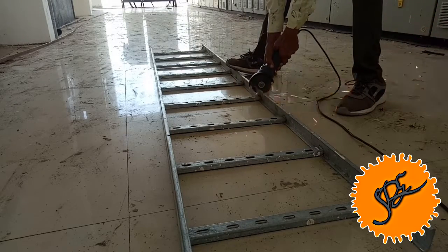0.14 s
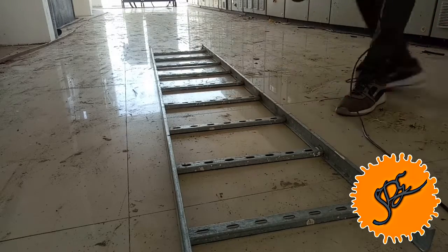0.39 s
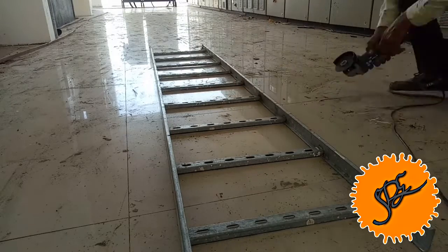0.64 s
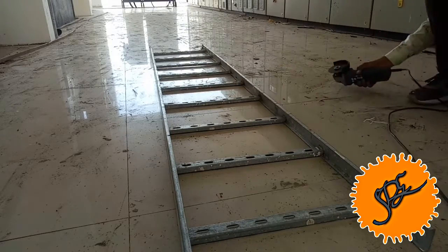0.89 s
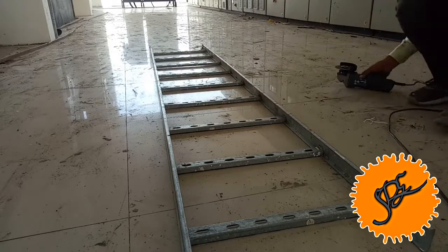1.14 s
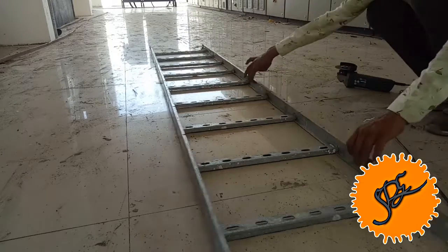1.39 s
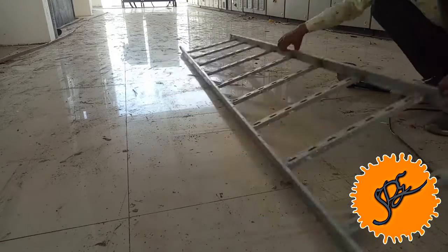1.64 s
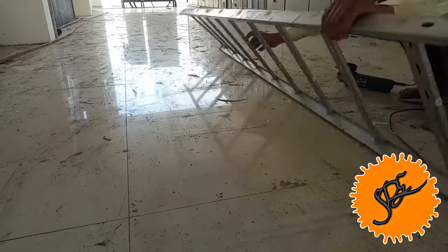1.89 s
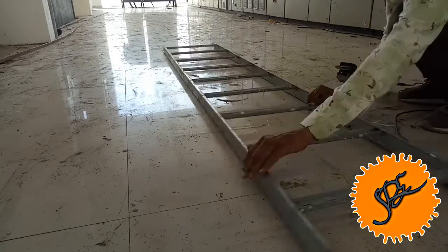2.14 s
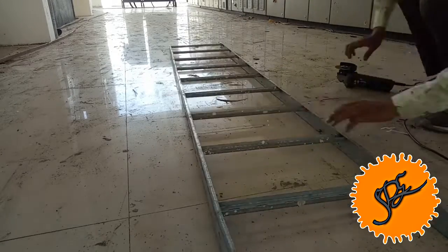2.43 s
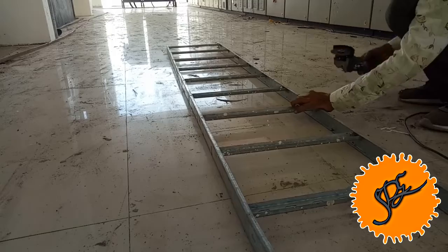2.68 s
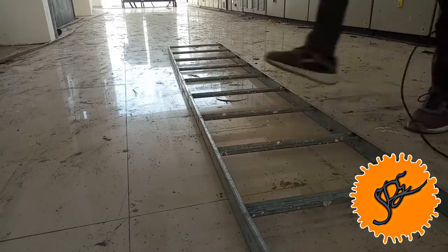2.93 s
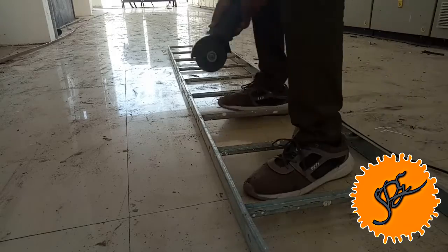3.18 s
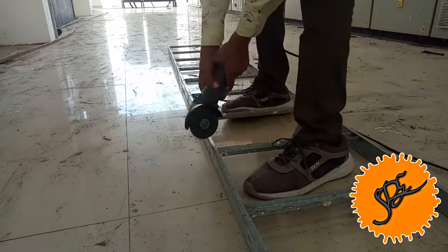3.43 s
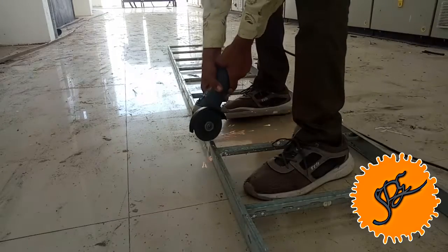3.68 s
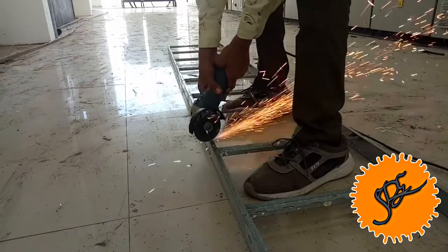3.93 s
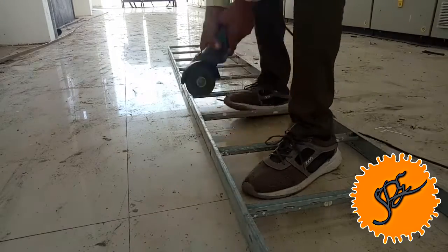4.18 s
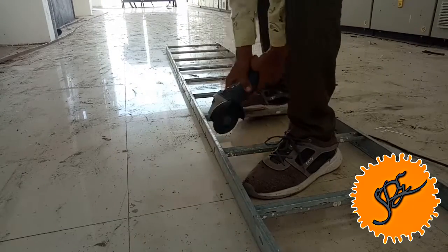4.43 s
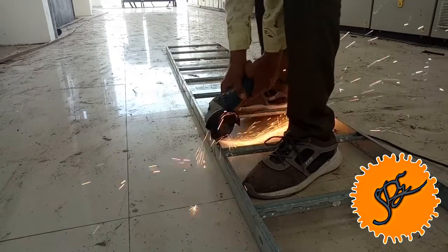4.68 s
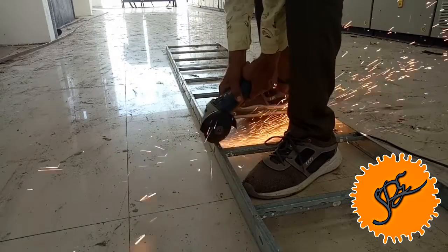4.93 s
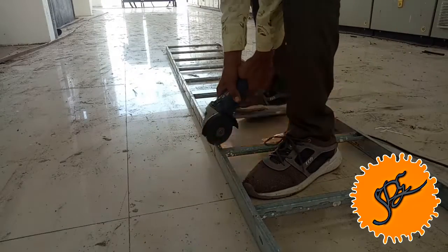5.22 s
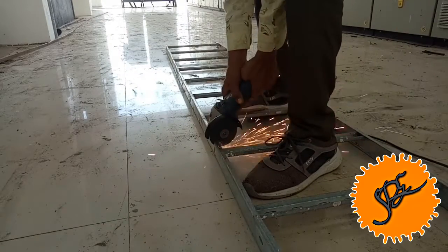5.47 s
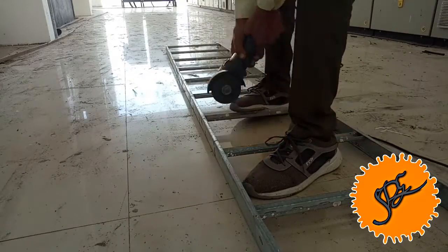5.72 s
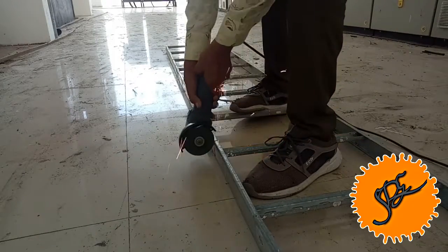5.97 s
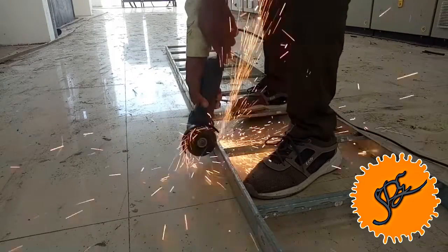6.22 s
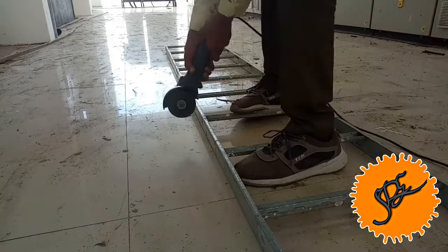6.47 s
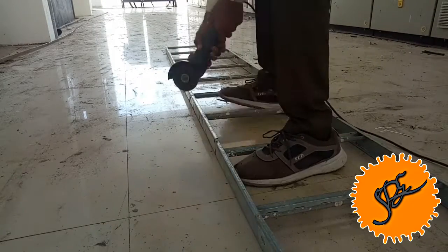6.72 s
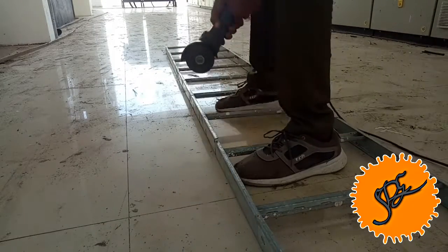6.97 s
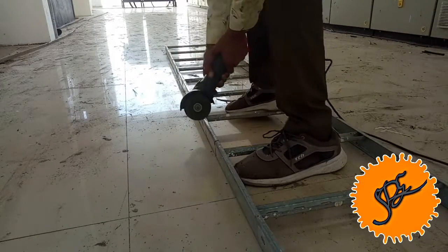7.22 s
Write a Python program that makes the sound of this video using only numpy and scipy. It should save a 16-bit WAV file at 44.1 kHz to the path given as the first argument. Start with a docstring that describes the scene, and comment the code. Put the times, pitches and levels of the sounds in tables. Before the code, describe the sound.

The sound opens on the last 0.2 seconds of an angle grinder cutting steel, a harsh rasp with a squeal near 2.7 kHz. The disc then whirrs free and coasts down, its gear tone falling at 0.4-0.8 and loose growl fading until it stops near 1.4. A thin steel tray clanks, then scrapes over tiles in uneven pulls until 2.7, with bright knocks and a thud around 2.0-2.2. Distant rumble and wavering low hum fill the quiet, with faint rustles and a small tick at 2.85. Clicks at 3.2 bring an abrupt motor start and steady airy whirr. Gritty, squealing cuts run at 3.6-4.1, 4.55-5.65 and 5.95-6.4; the long one is rough, with a sharp knock at 5.36, and the last starts with a screech. Free whirring fills the gaps and continues to about 7.4. Close, mostly left-weighted stereo, with shifting floor-reflection colour.

```python
"""In a hard-floored hall a handheld angle grinder ends a cut and runs down: shaped noise and a falling gear tone.
A steel cable tray is then tipped over and dragged: friction noise, decaying modes and short rings.
A low hum of wavering sines fills the quiet gap, over a distant rumble of shaped noise.
The grinder starts again, bites into the tray in short bursts of noise and squeal, and whirrs on.
The two microphone ports hear the noises with unlike colour."""
import sys
import numpy as np
from scipy import signal
from scipy.io import wavfile
from scipy.ndimage import uniform_filter1d

SR = 44100
rng = np.random.default_rng(int(sys.argv[2]) if len(sys.argv) > 2 else 0)


def decibels_to_gain(level_db):
    """Convert a level in decibels to a linear amplitude gain (20 dB per decade)."""
    exponent = np.asarray(level_db, float) / 20
    return 10 ** exponent


def wrap_up_sound(samples):
    """Save the sound to the file named by the first command line argument, as 16-bit audio."""
    columns = np.atleast_2d(samples).T
    # keep every value between -1 and 1, then stretch to whole-number steps
    tamed = np.clip(columns, -1, 1)
    steps = np.round(tamed * 32767).astype(np.int16)
    wavfile.write(sys.argv[1], SR, steps)


N = 324576  # samples

# Body of the whirr. Each row: frequency in Hz, level in dB.
WHIRR_SPECTRUM = [(710, -30), (1200, -9.5), (1590, -11), (2520, -5), (3300, -5.5), (4120, -5.5),
                  (5280, -24), (6000, -23.5), (7800, -42), (13200, -120)]
# Hiss of cooling air and brushes. Each row: frequency in Hz, level in dB.
FAN_SPECTRUM = [(2940, -32), (5000, -1), (6020, -7), (7860, -2), (9110, -11.5), (9880, -13), (11400, -16),
                (13300, -15), (15600, -14)]
# Gearbox growl. Each row: frequency in Hz, level in dB.
GROWL_SPECTRUM = [(35, -67), (60, -37), (466, -7), (577, -3), (871, -8), (1240, -8.5), (1800, -10),
                  (2340, -8.5), (3960, -120)]
# Run-down. Each row: time in seconds, whirr against the running level in dB, growl of the
# loose gears above its usual share in dB.
COAST = [(.24, 0, -3), (.5, -1.5, 2), (.75, -6, 8), (.92, -5.5, 4), (1.11, -6.5, 1.5), (1.17, -8.5, -2),
         (1.37, -21, 5)]
# Gear tone, falling as the motor slows and rising as it starts. Each row: start in seconds,
# end in seconds, start pitch in Hz, end pitch in Hz, top level in dB.
GEAR_GLIDES = [(0.426, 0.759, 531, 255.7, -61.5), (3.221, 3.391, 350, 676, -68)]
# The floor's echo lifts bands of the whirr, higher as the tool nears the tiles. Each row: start in seconds,
# end in seconds, start frequency in Hz, end frequency in Hz, top level against the body in dB.
ECHO_GLIDES = [(.2, .45, 2490, 2720, -10), (.6, 1.375, 4280, 4240, -4), (3.2, 3.663, 2630, 3600, -1),
               (4.102, 4.552, 2630, 3350, -1.5), (5.76, 5.96, 2450, 3700, -4), (5.62, 5.75, 3340, 2530, -1),
               (6.4, 6.696, 2370, 3800, -3.5), (6.72, 7.04, 2480, 2400, -3.5),
               (7.06, 7.357, 2380, 3400, -5)]
# Comb of that echo. Each row: ratio to the gliding frequency, width in Hz before squaring, level in dB.
ECHO_BANDS = [(1.009, 940, 2.5), (1.502, 680, -11), (0.514, 340, -17)]
STOP_S, SWITCH_ON_S, RUN_DB = 1.39, 3.2, -47.5
START_DIP_DB, START_DIP_S = -4, 0.06  # the level recovers from this dip after the switch
START_GROWL_DB, START_GROWL_S = -3, 0.45  # the growl recovers more slowly
FAN_DB, GROWL_DB = -15, -11.5  # shares at full speed
FAN_PER_COAST_DB = -0.54  # the fan's share grows by this per dB of coasting
GEAR_ENDS_DB, ECHO_ENDS_DB = -6.5, -4.5  # ends of a glide against its middle
ECHO_TOP_HZ = 4380  # the whirr carries little above this, so the comb fades there


def motor():
    """Broadband machine noise, comb-coloured by a floor reflection, with growl, fan hiss and gear tones."""
    hz, t = grid(size=512)
    restarted = t > STOP_S
    since_switch = np.maximum(t - SWITCH_ON_S, 0)
    coast_columns, _ = follow([COAST], t, 0.01)
    loss_db, loose_db = np.array(coast_columns) * (t < (STOP_S + SWITCH_ON_S) / 2)
    level_db = RUN_DB + loss_db + START_DIP_DB * np.exp(-since_switch / START_DIP_S) * restarted
    fan_db = FAN_DB + FAN_PER_COAST_DB * loss_db
    late_growl_db = START_GROWL_DB * np.exp(-since_switch / START_GROWL_S) * restarted
    growl_db = GROWL_DB + loose_db + late_growl_db

    glides = [arched(row, ECHO_ENDS_DB) for row in sorted(ECHO_GLIDES)]
    (echo_hz, echo_db), _ = follow(glides, t, 0.01)  # the curve is joined between glides
    comb = sum(decibels_to_gain(2 * db) * unit(peak(hz, ratio * echo_hz, width) ** 2) for ratio, width, db in ECHO_BANDS)
    comb = comb / (1 + (hz / ECHO_TOP_HZ) ** 16)
    power = unit(spectrum(WHIRR_SPECTRUM, hz) + decibels_to_gain(2 * echo_db) * comb)
    power = power + decibels_to_gain(2 * fan_db) * spectrum(FAN_SPECTRUM, hz)
    power = power + decibels_to_gain(2 * growl_db) * spectrum(GROWL_SPECTRUM, hz)

    whirr = noise(decibels_to_gain(2 * level_db) * power, size=512, patchy_db=1.8)
    whirr = whirr * grainy(0.66, 0.00287) * flutter(0.13)
    s = np.arange(N) / SR
    powered_or_coasting = (s < STOP_S) | (s > SWITCH_ON_S)
    gears = sum(tone(arched(row, GEAR_ENDS_DB), 3.3, 0.0079, 19.8) for row in GEAR_GLIDES)
    return whirr * powered_or_coasting + gears


# Disc in the steel, one table a burst. Each row: time in seconds, level in dB, squeal in Hz,
# depth of bite from 0 to 1.
CUTS = [
    [(0, -41.5, 2800, 0), (.09, -38.5, 2750, 0.13), (.172, -39.5, 2700, 0), (.22, -48.5, 2920, 0.14)],
    [(3.62, -54, 2900, 0), (3.7, -45, 2950, 0), (3.728, -39, 2970, 0), (3.758, -47, 2950, .05),
     (3.792, -41.5, 2730, 0.17), (3.85, -38.5, 2750, 0.01), (3.972, -38.5, 2710, 0.48),
     (4.058, -39, 2950, 0.32), (4.1, -61, 2770, 0.6)],
    [(4.54, -49.5, 3000, .3), (4.586, -39.5, 2870, 0.47), (4.66, -38.5, 2800, .6),
     (4.742, -39.5, 2830, 0.75), (4.772, -39, 2960, 0.26), (4.886, -42.5, 2910, 0.22),
     (4.978, -39, 2980, .55), (5.01, -41, 2900, 0.1), (5.036, -42, 3000, 0.58), (5.126, -38.5, 3150, .2),
     (5.182, -42, 3200, 0.83), (5.244, -40.5, 3340, 0), (5.27, -44, 3100, 0.16), (5.34, -49.5, 2730, .5),
     (5.356, -40, 2770, .7), (5.372, -45.5, 2900, 0.54), (5.395, -43, 2930, 0.8), (5.434, -35.5, 3220, 1),
     (5.52, -39, 3000, 0.76), (5.602, -40, 2970, 0.18), (5.635, -45.5, 2920, 0), (5.66, -60, 2900, 0)],
    [(5.95, -64, 2710, 0.2), (5.975, -40, 2720, 0), (5.998, -43, 2700, 0), (6.028, -40.5, 2700, 0.46),
     (6.15, -39, 2710, 0.45), (6.284, -37.5, 2700, .7), (6.322, -37, 2600, 0.95), (6.35, -41.5, 2600, 0.3),
     (6.39, -66, 2700, 0.6)],
]
# Abrasive on steel. Each row: frequency in Hz, level in dB.
GRIND_SPECTRUM = [(180, -34), (300, -14), (369, -17), (556, -13), (1990, -10), (2850, -11.5), (3690, -5),
                  (4140, -2.5), (5020, -15.5), (6500, -16), (8450, -22), (14300, -120)]
# Spray of sparks. Each row: frequency in Hz, level in dB.
SPARK_SPECTRUM = [(2940, -34), (5000, -2.5), (5580, -10), (6050, -18), (8280, -8.5), (9970, -18),
                  (10700, -10.5), (11300, -21), (14200, -12), (15600, -18)]
# The tray shaking on the floor. Each row: frequency in Hz, level in dB.
SHUDDER_SPECTRUM = [(18, -38), (30, -9), (133, 4.5), (392, 0), (574, -2), (700, 0), (910, -33),
                    (1540, -120)]
# Linked resonances of the disc. Each row: ratio to the squeal, width in Hz before squaring, level in dB.
DISC_MODES = [(0.976, 340, 1), (1.424, 830, -7.5), (1.124, 390, -6), (0.87, 71, -7)]
# Edges throw more sparks than the face. Each value: offset of one burst's sparks in dB.
BURST_SPARKS_DB = (2.5, -3.5, 1.5, 1.5)
# A deep bite damps the squeal, throws sparks and shakes the tray: dB skimming, dB at full depth.
SQUEAL_DB, SPARKS_DB, SHUDDER_DB = (4.51, -12.49), (-12.5, -10.5), (-35, -8.5)


def cutting():
    """Abrasive noise and friction-driven resonance: grains tear at the steel and the bite's depth damps the squeal."""
    hz, t = grid(size=1024)
    (_, squeal_hz, depth), _ = follow(CUTS, t, 0.012)
    by_depth = (skim + (deep - skim) * depth for skim, deep in (SQUEAL_DB, SPARKS_DB, SHUDDER_DB))
    squeal_db, spark_db, shudder_db = by_depth
    burst = np.searchsorted([rows[-1][0] for rows in CUTS[:-1]], t)
    spark_db = spark_db + np.take(BURST_SPARKS_DB, burst)

    squeal = sum(decibels_to_gain(2 * db) * unit(peak(hz, ratio * squeal_hz, width) ** 2) for ratio, width, db in DISC_MODES)
    power = unit(spectrum(GRIND_SPECTRUM, hz) + decibels_to_gain(2 * squeal_db) * squeal)
    power = power + decibels_to_gain(2 * spark_db) * spectrum(SPARK_SPECTRUM, hz)
    power = power + decibels_to_gain(2 * shudder_db) * spectrum(SHUDDER_SPECTRUM, hz)

    (level_db, *_), gate = follow(CUTS, np.arange(N) / SR, 0.004)
    sound = noise(power, size=1024, patchy_db=2.32) * decibels_to_gain(level_db) * gate
    return sound * grainy(0.69, 0.015) * grainy(0.61, 0.018) * flutter(0.081)


# Brief clear screeches of the steel. Each row: start in seconds, end in seconds, start pitch in Hz,
# end pitch in Hz, level in dB.
SCREECHES = [(0, 0.05, 3470, 3420, -48), (0, 0.192, 2620, 2680, -56), (.16, 0.2, 3100, 3050, -49),
             (3.966, 4.084, 4160, 4160, -53.5), (4.586, 4.773, 4160, 4200, -54),
             (5.418, 5.483, 4060, 3970, -55), (5.967, 6.032, 1790, 1760, -51),
             (5.968, 6.123, 2693, 2608, -42.5), (6.195, 6.346, 2620, 2560, -50)]


def screeches():
    """Self-sustained oscillation: short gliding tones that waver in level and pitch."""
    return sum(tone([(start, start_hz, db), (end, end_hz, db)], 3.3, 0.005, 34.8)
               for start, end, start_hz, end_hz, db in SCREECHES)


# Tray scraping over the tiles: pulls, some in two overlapping rows, and faint rustles in the quiet gap.
# Each row: start in seconds, contact in seconds, level before fading in dB, rise in seconds,
# tilt at mid-contact in dB per octave.
PULLS = [(1.377, .03, -46.5, 0.017, -2.5), (1.395, 0.048, -45, 0.041, -2), (1.555, 0.13, -49, 0.041, 3.5),
         (1.66, .12, -51.5, 0.036, 5.5), (1.775, 0.063, -56, 0.015, -3), (1.872, 0.088, -50.5, 0.019, 2),
         (1.994, 0.039, -46, .004, -1), (2.05, .075, -51.5, 0.033, -7.5), (2.131, 0.11, -50, 0.0046, 1.5),
         (2.255, 0.11, -50.5, 0.075, 3.5), (2.4, .78, -83, 0.072, 15), (2.53, 0.17, -50.5, 0.073, 2.5),
         (2.84, 0.017, -66, 0.0094, 6), (2.995, 0.056, -68, .006, 5.5), (3.08, 0.035, -66, .006, -3),
         (3.155, 0.011, -65.5, 0.0052, -6)]
PULL_START_DB, PULL_FADE_DB_PER_S, RING_OUT_DB_PER_S = -16, -11, -105
GRIT_DB, GRIT_OUT_DB_PER_S = -16.5, -200  # grit stops with the contact
BODY_DB, BODY_PER_TILT = -7.5, -0.27  # share at no tilt; dull pulls boom more
BODY_LINGERS_DB_PER_S = 33  # the low body outlasts the scrape
TILT_PER_S, TILT_OUT_PER_S = 11, -24  # dB per octave and second: brighter in a pull, duller as it rings out


def pulls(t):
    """Power addition of all rows: level, grit share, tilt and body share as each rises, fades and rings out."""
    start, contact, db, rise, tilt_db = np.transpose(PULLS)[:, :, None]
    age = t - start
    after = np.maximum(age - contact, 0)
    shape_db = PULL_START_DB * np.clip(1 - age / rise, 0, 1) + PULL_FADE_DB_PER_S * age + RING_OUT_DB_PER_S * after
    power = decibels_to_gain(2 * (db + shape_db)) * (age > 0) + 1e-30
    share = unit(power)
    grit_db = np.maximum(GRIT_DB + GRIT_OUT_DB_PER_S * after, -60)
    tilt_db = tilt_db + TILT_PER_S * np.clip(age - contact / 2, -0.2, 0.2)
    tilt_db = tilt_db + TILT_OUT_PER_S * np.minimum(after, 0.2)
    body_db = BODY_DB + BODY_PER_TILT * tilt_db + BODY_LINGERS_DB_PER_S * np.minimum(after, 0.2)
    level = np.sqrt(power.sum(0))
    grit = (share * decibels_to_gain(2 * grit_db)).sum(0)
    body = (share * decibels_to_gain(2 * body_db)).sum(0)
    return level, grit, (share * tilt_db).sum(0), body


# Rub of steel on tile. Each row: frequency in Hz, level in dB.
SCRAPE_SPECTRUM = [(470, -29), (800, -11.5), (1650, -11), (1830, -2.5), (2090, -12.5), (2290, -3.5),
                   (2540, -12.5), (4040, -10.5), (6000, -35.5), (7800, -38), (13200, -120)]
# Fine grit under the steel. Each row: frequency in Hz, level in dB.
GRIT_SPECTRUM = [(2940, -14), (5000, 0), (5660, -2), (8090, -4.5), (11300, -23), (14300, -24), (15100, -28),
                 (15600, -35)]
# Low boom of the tray. Each row: frequency in Hz, level in dB.
BODY_SPECTRUM = [(88, -56), (150, -16), (258, -23.5), (292, -8), (462, -10.5), (569, -0.5), (690, 1.5),
                 (1100, -13), (1430, -47), (2420, -120)]
# Modes of the tray, also struck by the knocks. Each row: frequency in Hz, level in dB, t60 in seconds.
TRAY_MODES = [(477, -14.5, 0.23), (652, -33, 0.073), (1272, -1.5, 0.078), (1456, -7.5, 0.17),
              (1845, -9, 0.32), (2130, -38, 0.082), (2724, -0.5, 0.042), (3000, -5.5, 0.33),
              (3420, -6, 0.24), (3800, -2.5, 0.12), (4100, -9, 0.14), (4330, -3.5, 0.052)]


def dragging():
    """Friction excitation: rubbing on the tiles makes noise and keeps the tray's modes humming."""
    hz, t = grid(size=1024)
    _, grit, tilt_db, body = pulls(t)
    modes = sum(decibels_to_gain(2 * db) * peak(hz, mode_hz, 70) for mode_hz, db, _ in TRAY_MODES[2:])
    power = spectrum(SCRAPE_SPECTRUM, hz) + 0.46 * unit(modes)
    thin = 1 / (1 + (900 / (hz + 1)) ** 6)  # the open tray radiates little at low frequencies
    power = unit(thin * power * decibels_to_gain(2 * tilt_db * np.log2((hz + 300) / 2500)))
    power = power + grit * spectrum(GRIT_SPECTRUM, hz)
    power = power + body * spectrum(BODY_SPECTRUM, hz)
    level = pulls(np.arange(N) / SR)[0]
    return noise(power, size=1024, patchy_db=2.0) * level * grainy(1.14, 0.0055)


# Knocks on the tray. Each row: time in seconds, peak of the ring in dB, brightness in dB per octave,
# ring time as a factor on t60.
KNOCKS = [(1.41, -38.5, -2, 0.86), (1.427, -41.5, -4, 0.62), (1.998, -43, 3, 0.32), (2.009, -40, 5, 0.44),
          (2.136, -36, 6, 0.37), (2.203, -44, 3, 0.33), (2.597, -50, -7, 0.84), (2.854, -51, 7, 0.25),
          (5.357, -33, -1, .2)]


def knocks():
    """Modal synthesis: each blow is a short crack and decaying modes, struck at another spot each time."""
    mode_hz, mode_db, t60 = np.transpose(TRAY_MODES)[:, :, None]
    t, out = np.arange(SR // 4) / SR, np.zeros(N + SR)
    for s, peak_db, tilt_db, ring_time in KNOCKS:
        spot_level, phase, detune = rng.standard_normal((3, len(TRAY_MODES), 1))
        level_db = mode_db + 2.0 * spot_level + tilt_db * np.log2(mode_hz / 2500)
        decay = decibels_to_gain(level_db - 60 * t / (ring_time * t60))
        ring = (decay * np.sin(2 * np.pi * (mode_hz * (1 + 0.0264 * detune) * t + phase))).sum(0)
        crack = uniform_filter1d(rng.standard_normal(len(t)), size=3) * decibels_to_gain(tilt_db - 60 * t / 0.031)
        out[round(s * SR):][:len(t)] += decibels_to_gain(peak_db) * (ring / abs(ring).max() + 0.061 * crack)
    return out[:N] * np.array([[1.45], [0.55]])


# Thud of the tray, the switch, first jerks of the gears, low snags of the disc. Each row: time in seconds,
# level before the rise in dB, frequency in Hz, t60 in seconds.
TICKS = [(2.104, -47.5, 305, 0.089), (3.983, -50, 200, 0.044), (3.16, -70, 7500, 0.0067),
         (3.165, -46, 3850, 0.0061), (3.2, -40, 2830, 0.022), (3.212, -31, 2910, 0.009),
         (3.2255, -37, 3820, 0.011), (3.241, -53, 8350, 0.011), (3.258, -47, 8100, 0.012),
         (4.589, -41.5, 244, 0.025), (5.359, -46, 280, 0.03)]


def ticks():
    """Damped free vibration: each tick is one sine that rises within a millisecond and decays."""
    t, out = np.arange(SR // 4) / SR, np.zeros(N + SR)
    rise = np.minimum(t / 0.00092, 1)
    for s, level_db, tick_hz, t60_s in TICKS:
        ring = decibels_to_gain(level_db - 60 * t / t60_s) * np.sin(2 * np.pi * tick_hz * t)
        out[round(s * SR):][:len(t)] += rise * ring
    return out[:N] * np.array([[1.45], [0.55]])


# Level of the rumble, which swells in the quiet gap. Each row: time in seconds, level in dB.
RUMBLE_LEVEL = [(.45, -76), (.8, -70), (1.15, -68), (1.37, -66.5), (1.4, -75), (1.55, -69), (2.3, -65.5),
                (2.66, -59), (3.19, -63.5), (3.22, -72), (3.7, -82), (4.1, -86), (6.5, -89)]
# Colour of the rumble. Each row: frequency in Hz, level in dB.
RUMBLE_SPECTRUM = [(15, -36), (25, -20), (65, -8), (113, -6), (157, -8.5), (224, -6.5), (280, -10),
                   (595, -19.5), (2410, -33.5), (5000, -33), (6500, -67), (11000, -120)]
# Low hum in the quiet. Each row: start in seconds, end in seconds, start pitch in Hz, end pitch in Hz,
# level of the fundamental in dB.
HUM = [(2.38, 2.592, 103.3, 124, -68), (2.784, 2.973, 122, 112.4, -71), (2.994, 3.196, 118.2, 110.8, -65)]
HUM_OCTAVE_DB = -5  # octave against the fundamental


def hall():
    """Low-pass background noise, a distant rumble, and a harmonic pair of wavering low tones."""
    hz, t = grid(size=2048)
    (level_db,), _ = follow([RUMBLE_LEVEL], t, 0.01)
    rumble = noise(decibels_to_gain(2 * level_db) * spectrum(RUMBLE_SPECTRUM, hz), size=2048, patchy_db=2.5)
    hum = 0
    for start, end, start_hz, end_hz, db in HUM:
        octave_db = db + HUM_OCTAVE_DB
        hum = hum + tone([(start, start_hz, db, octave_db), (end, end_hz, db, octave_db)], 3.3, 0.025, 3.04)
    return rumble + hum


def read(points, hz):
    """Logarithmic interpolation: value of a spectrum table at hz, straight on a log axis."""
    f, value = np.transpose(points)
    return np.interp(np.log(hz + 1), np.log(f + 1), value)


def grid(size):
    """Short-time Fourier grid: bin frequencies in Hz (column) and frame times in seconds."""
    return np.fft.rfftfreq(size, 1 / SR)[:, None], np.arange(4 * N // size + 5) * size / 4 / SR


def unit(power):
    """Power normalisation: scales each frame of a power spectrum to a total of one."""
    return power / power.sum(0)


def spectrum(points, hz):
    """Spectral density of a table in dB, as power with a total of one."""
    return unit(decibels_to_gain(2 * read(points, hz)))


def peak(hz, centre_hz, width):
    """Lorentzian resonance: its power over frequency, total one."""
    return unit(1 / (1 + ((hz - centre_hz) / (width / 2)) ** 2))


def follow(tables, t, fade):
    """Piecewise-linear envelopes: columns of curve tables at times t, and a gate open inside them, with fades."""
    s, *columns = np.vstack(tables).T
    gate = sum(np.clip(np.minimum(t - rows[0][0], rows[-1][0] - t) / fade + 1, 0, 1) for rows in tables)
    return [np.interp(t, s, c) for c in columns], np.minimum(gate, 1)


def arched(row, ends_db):
    """Geometric glide, pitch moving by equal ratios, loudest midway: curve rows of seconds, Hz and dB."""
    start, end, start_hz, end_hz, db = row
    u = np.linspace(0, 1, num=7)
    return np.transpose([start + u * (end - start), start_hz * (end_hz / start_hz) ** u, db + ends_db * (2 * u - 1) ** 2])


# Likeness of the ports. Each row: frequency in Hz, left-right correlation from 0 to 1.
PORT_LIKENESS = [(60, 1), (130, 0.49), (290, 0.66), (640, 0.5), (1410, 0.038), (3100, 0.41), (6820, 0.0083),
                 (15000, 0.38)]
# Balance of the ports. Each row: frequency in Hz, left above right in dB.
PORT_BALANCE = [(60, 17), (92, 9.5), (140, 5), (210, 9.5), (330, 8), (500, 8), (770, 9), (1170, 8.5),
                (1790, 9), (2740, 10.5), (4190, 14), (6410, 1), (9810, -7), (15000, 38.5)]
# Phase between the ports. Each row: frequency in Hz, lead of the left in radians.
PORT_LEAD = [(0, 1), (2670, -0.43), (4220, -2), (6290, -4.5), (10200, -3.0), (10900, 16.5), (13900, -1),
             (15300, -29)]


def ports(z, hz):
    """Interchannel coherence: mixes two unrelated spectra into left and right, the power of their mean kept."""
    same, lead = np.clip(read(PORT_LIKENESS, hz), -1, 1), read(PORT_LEAD, hz)
    turn, side = np.exp(0.5j * lead), decibels_to_gain(read(PORT_BALANCE, hz) / 2)
    left = z[0] * side * turn
    right = (same * z[0] + np.sqrt(1 - same ** 2) * z[1]) / side / turn
    mean_power = (side ** 2 + side ** -2 + 2 * same * np.cos(lead)) / 4
    return np.array([left, right]) / np.sqrt(mean_power)


def noise(power, size, patchy_db):
    """Filtered Gaussian noise in stereo, from power per bin and frame, with drifting patches."""
    a, b, c, d, patches = rng.standard_normal((*power.shape[::-1], 5)).T
    patches = uniform_filter1d(uniform_filter1d(patches, size=6, axis=0), size=14, axis=1)
    z = np.array([a + 1j * b, c + 1j * d]) * np.sqrt(power) * decibels_to_gain(patchy_db * patches / patches.std())
    pair = signal.istft(ports(z, grid(size)[0]), nperseg=size, noverlap=size * 3 // 4)[1][:, :N]
    return np.sqrt(3 / 4) * pair


def grainy(depth_db, seconds):
    """Random amplitude modulation of mean power one: the level jitters quickly."""
    jumps = uniform_filter1d(rng.standard_normal(N), max(round(seconds * SR), 1))
    gain = decibels_to_gain(depth_db * jumps / jumps.std())
    return gain / np.sqrt(np.mean(gain ** 2))


def tone(rows, rough_db, seconds, blur_hz):
    """Frequency-modulated harmonics: rows of seconds, Hz and a level in dB per harmonic; the pitch trembles."""
    (hz, *levels_db), gate = follow([rows], np.arange(N) / SR, 0.01)
    tremble = uniform_filter1d(rng.standard_normal(N), round(seconds * SR))
    angle = 2 * np.pi * np.cumsum(hz + blur_hz * tremble / tremble.std()) / SR
    sound = sum(decibels_to_gain(db) * np.sqrt(2) * np.sin(k * angle) for k, db in enumerate(levels_db, 1))
    return sound * gate * grainy(rough_db, seconds) * np.array([[1.5], [0.5]])


def flutter(depth):
    """Sinusoidal amplitude modulation: a faint throb at a fixed quick rate."""
    return 1 + depth * np.sin(2 * np.pi * 172.27 * np.arange(N) / SR)  # rate in Hz


def scene():
    """Superposition: all sources add at the microphone."""
    return motor() + cutting() + screeches() + dragging() + knocks() + ticks() + hall()


def top_cut(x):
    """Nothing passes above the cut-off."""
    return signal.sosfilt(signal.butter(12, 15450, fs=SR, output="sos"), x)


CEILING = 0.048  # peaks are rounded off near this size


def record(dry):
    """Soft saturation: the input stage rounds off the peaks."""
    mix = CEILING * np.tanh(dry / CEILING)
    return top_cut(mix)


dry = scene()
out = record(dry)
wrap_up_sound(out)
```